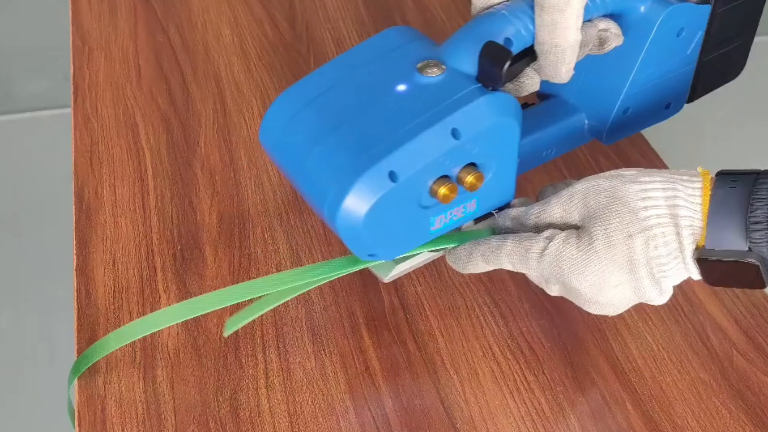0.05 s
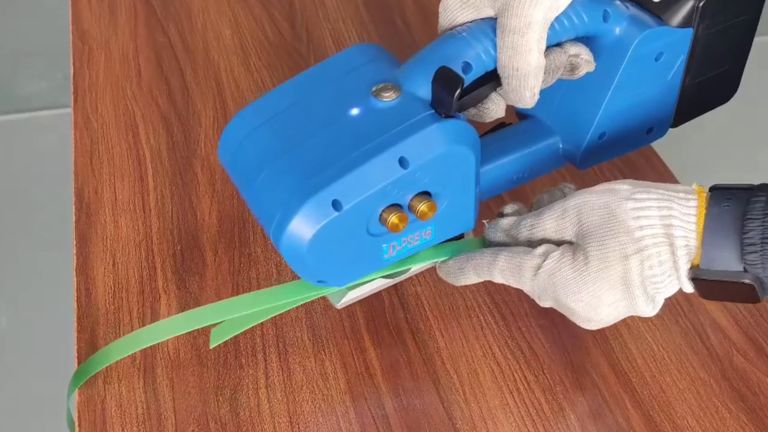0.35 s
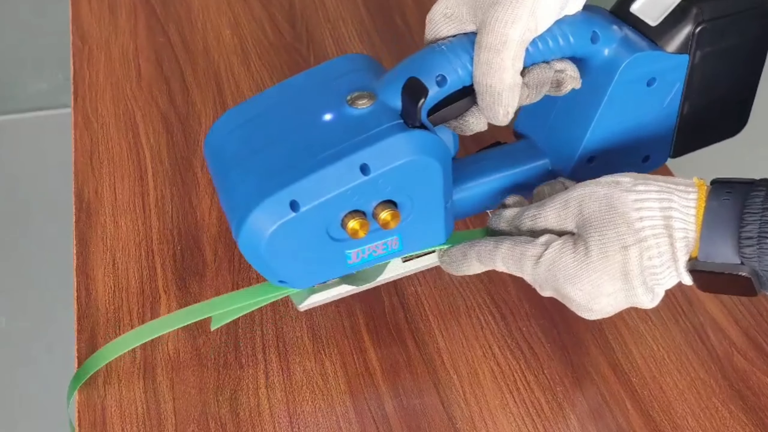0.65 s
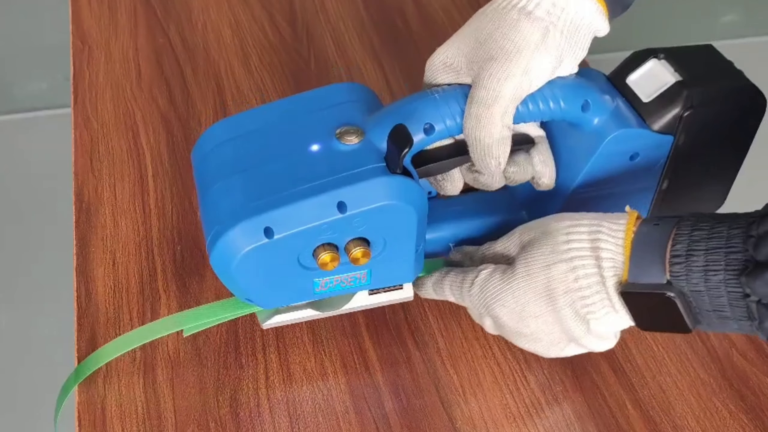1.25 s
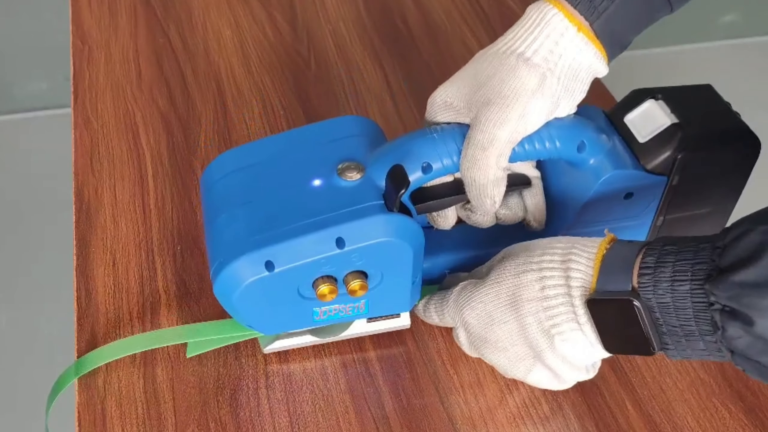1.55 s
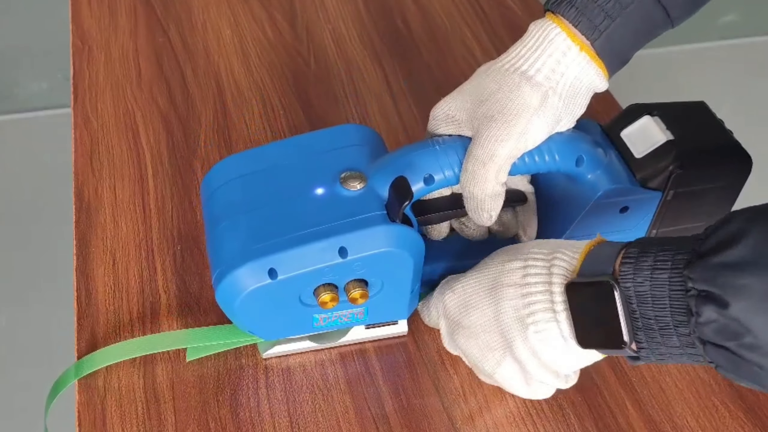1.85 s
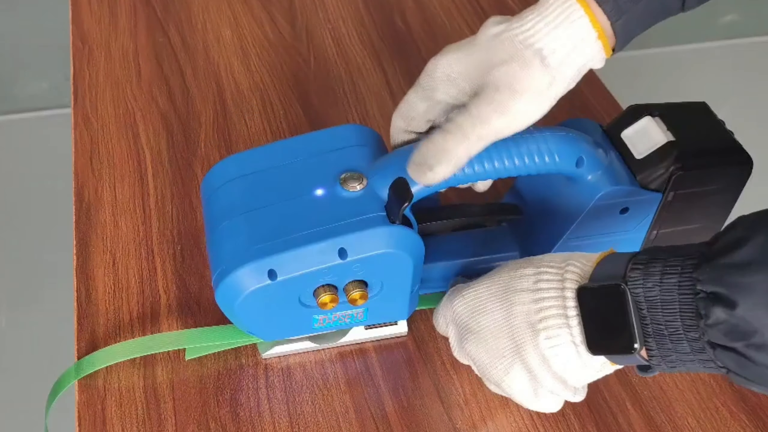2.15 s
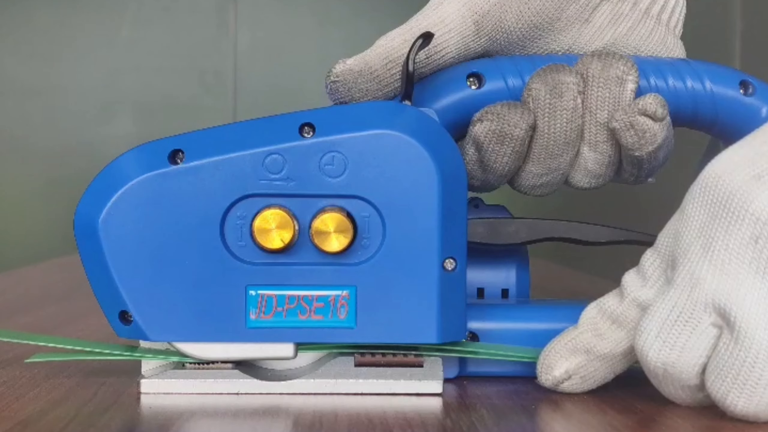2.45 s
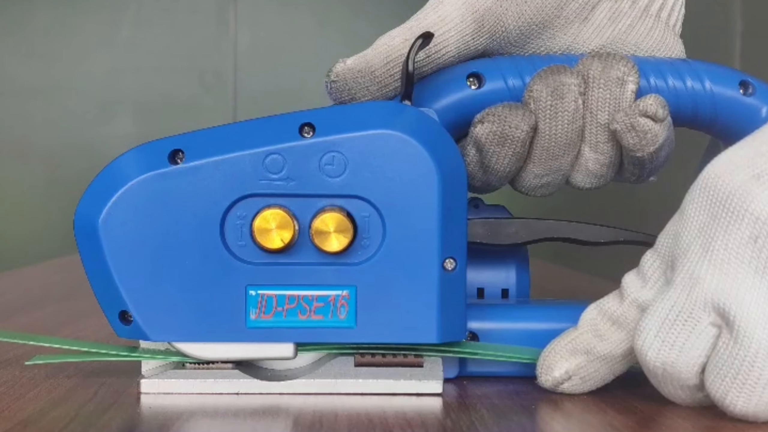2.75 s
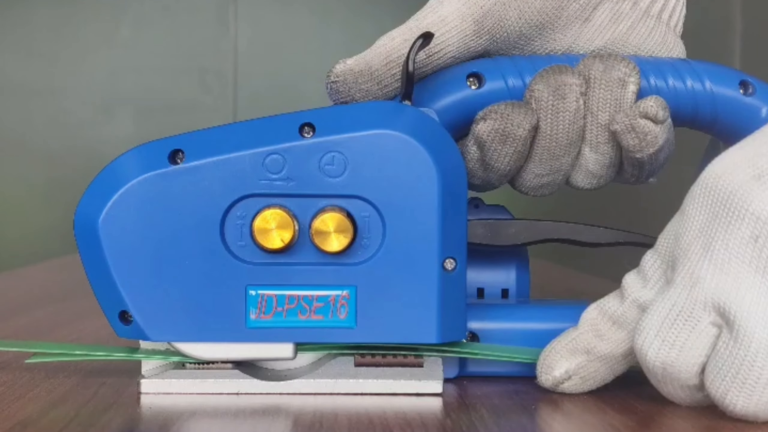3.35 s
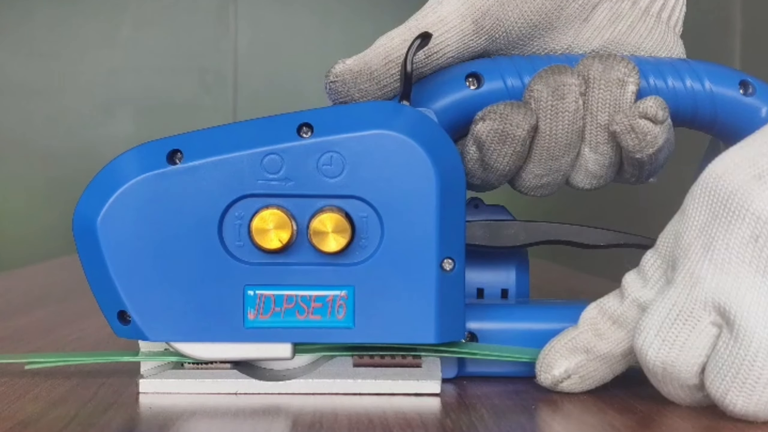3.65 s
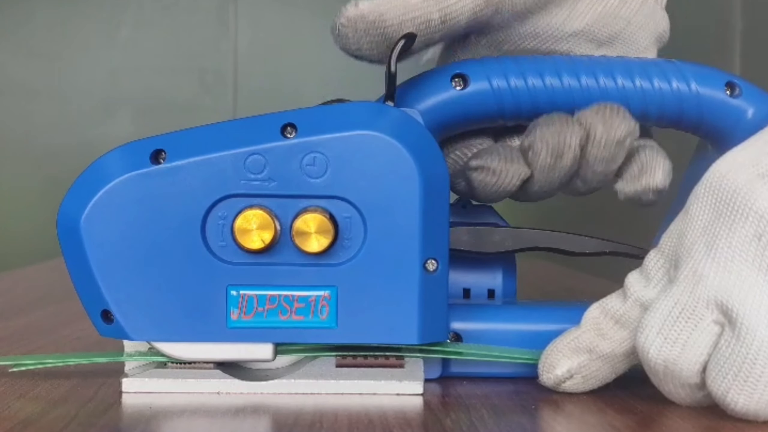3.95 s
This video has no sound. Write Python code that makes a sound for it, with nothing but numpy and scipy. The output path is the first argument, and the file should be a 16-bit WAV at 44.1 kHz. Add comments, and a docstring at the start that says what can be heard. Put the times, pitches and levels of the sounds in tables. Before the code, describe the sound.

A battery strapping tool whirs briefly in a hard-walled workshop. First a plastic strap clicks and scrapes into its jaw and something thumps the wooden table; then the nearby motor whines, rattles, slows and stops with deep knocks.

```python
"""Plastic strap slides and clicks into the jaw of a battery strapping tool, and something thumps on the
wooden table under it. Then the motor spins up: one shaft speed drives the whine and the gear rattle that
rings the housing. The speed sags as the strap comes tight; the tool shakes the table, kicks against it
and stops. The hard-walled workshop rings on over a low rumble and hiss."""
import sys
import numpy as np
from scipy import signal
from scipy.fft import rfft, irfft, next_fast_len
from scipy.io import wavfile
from scipy.ndimage import map_coordinates

SR = 44100
rng = np.random.default_rng(int(sys.argv[2]) if len(sys.argv) > 2 else 0)


def dump(signal):
    """Clip the signal to [-1, 1] and save it as 16-bit WAV at the path in sys.argv[1]."""
    limited = np.clip(np.atleast_2d(signal).T, -1, 1)
    pcm = np.round(limited * 32767).astype(np.int16)
    wavfile.write(sys.argv[1], SR, pcm)


N = 176400
T = np.arange(N) / SR
FULL_SPEED_HZ = 230.6  # motor shaft
# Stereo image near the tool. Each row: frequency in Hz, left-right correlation.
TOOL_CORRELATION = [(300, 1), (900, 0.86), (2000, 0.12), (5000, -.1), (8000, 0.07), (12000, -.5)]


def amp(db):
    """Decibels to gain."""
    return 10 ** (np.asarray(db) / 20)


def unit(x):
    """Scale to rms 1."""
    return x / np.sqrt(np.mean(x ** 2) + 1e-20)


def along(points, hz):
    """Interpolate (Hz, value) rows on a log axis."""
    f, v = np.transpose(points)
    return np.interp(np.log(hz + 1), np.log(f + 1), v)


def curve(rows):
    """Interpolate (s, value) rows at every sample."""
    return np.interp(T, *np.transpose(rows))


def wobble(rate_hz):
    """Smooth random curve, rms near 1, with rate_hz knots a second."""
    return map_coordinates(rng.standard_normal(int(N * rate_hz / SR) + 4), [T * rate_hz])


def noise():
    """Two independent white noises."""
    return rng.standard_normal((2, N))


def pan(db):
    """Constant-power gains, left over right by db."""
    return unit(amp([[db / 2], [-db / 2]]))


def filtered(x, response):
    """Apply a frequency response, given as a function of Hz."""
    m = next_fast_len(N + SR // 2)
    return irfft(rfft(x, m) * response(np.fft.rfftfreq(m, 1 / SR)), m)[..., :N]


def resonance(f, hz, width_hz):
    """Causal response of one mode."""
    return 1j * f * width_hz / (hz * hz - f * f + 1j * f * width_hz)


def spread(pair, spectrum=((1000, 0),), correlation=TOOL_CORRELATION):
    """Mix two independent signals to stereo of rms 1; the default spectrum is flat."""
    def mid_side_gains(f):
        angle = np.arccos(np.clip(along(correlation, f), -0.99, 0.99)) / 2
        return amp(along(spectrum, f)) * [np.cos(angle), np.sin(angle)]
    mid, side = filtered(pair, mid_side_gains)
    return unit(np.array([mid + side, mid - side]))


def fuzzy_tone(cycles, width_hz):
    """Stereo tone blurred over a narrow band, rms 1."""
    blur = np.array([wobble(2 * width_hz) + 1j * wobble(2 * width_hz) for side in range(2)])
    return unit(np.real(blur * np.exp(2j * np.pi * cycles)))


def reverb(x, wet_db):
    """The hard walls return a decaying tail, near mono in the bass."""
    # Room decay. Each row: frequency in Hz, T60 in seconds.
    t60_s = [(120, 0.81), (800, 1.06), (2000, 0.96), (5000, 0.9), (9000, 0.63), (14000, 0.25)]
    hz, t, bands = signal.stft(noise()[:, :SR], SR, nperseg=256)
    tail = signal.istft(bands * amp(-60 * t / along(t60_s, hz)[:, None]), SR, nperseg=256)[1]
    mid, side = tail / np.linalg.norm(tail[0])
    side = signal.sosfilt(signal.butter(1, 700, 'high', fs=SR, output='sos'), side)
    tail = np.pad([mid + side, mid - side], ((0, 0), (SR // 300, 0))) / np.sqrt(2)
    return amp(wet_db) * signal.fftconvolve(x * np.ones((2, 1)), tail, axes=1)[:, :N]


def air():
    """The workshop's low rumble and hiss."""
    # Each row: frequency in Hz, relative density in dB.
    spectrum = [(15, -21.5), (23, 10), (29, -14), (40, 1.5), (50, -13.5), (110, -6), (160, -15.5),
                (200, -14.5), (290, -13.5), (420, -20), (580, -23.5), (800, -25), (1300, -28.5),
                (3260, -37.5), (7800, -38), (9500, -47.5), (15500, -50)]
    # Each row: frequency in Hz, left-right correlation.
    correlation = [(60, 0.94), (180, 1), (550, 0.33), (1650, -0.45), (4970, 0.011), (15000, 0.13)]
    return amp(-42.5 + 0.84 * wobble(3.5)) * spread(noise(), spectrum, correlation)


def strap():
    """Strap and glove scrape grainily against the tool."""
    # Each row: time in seconds, level in dB.
    slide_db = [(0, -54.5), (.3, -54.5), (.42, -61), (.55, -57), (.88, -64), (1.03, -47), (1.1, -48.5),
                (1.14, -40.5), (1.2, -46), (1.27, -47), (1.45, -54), (2.1, -59), (2.5, -60.5)]
    # Each row: frequency in Hz, relative density in dB.
    spectrum = [(290, -26), (500, -5.5), (594, -3), (901, -25.5), (1720, -11.5), (5050, -17.5),
                (5670, -24.5), (8120, -19.5), (15500, -47)]
    level = amp(curve(slide_db) + 1.76 * wobble(25.1))
    grains = noise() * amp(0.82 * wobble(500))
    return level * spread(grains, spectrum)


def clicks(spectrum, ring_trim_db=0):
    """Plastic and steel crack in the jaw: noise bursts, each with its own colour and short ring."""
    # Each row: start in seconds, level in dB, T60 in seconds, bass in dB, treble in dB,
    # ring pitch in Hz, ring gain in dB.
    cracks = [(.066, -18, 0.099, 5, -11, 3070, -3), (.186, -24, .008, -12, 2, 7500, -1),
              (0.25, -24.5, 0.015, -3, -9, 7500, -10), (.29, -22, 0.0092, 10, -8, 7500, -12),
              (.345, -6, 0.016, -5, -24, 5400, -16), (0.5782, 3.5, 0.012, -1.5, -2.5, 3290, 6.5),
              (0.9651, -6, 0.052, 11.5, -18, 1740, 17), (1.0117, -18.5, 0.079, -3, -4, 7500, -9),
              (1.915, -22.5, 0.016, 4, -22, 2670, 16)]
    out, t = np.zeros((2, N)), np.arange(SR // 10) / SR
    size, lead = 2 * len(t), SR // 100
    f = np.fft.rfftfreq(size, 1 / SR)
    for start_s, db, t60_s, bass_db, treble_db, ring_hz, ring_db in cracks:
        common, left, right = rng.standard_normal((3, len(t))) * amp(-60 * t / t60_s)
        burst = common + 0.62 * np.array([left, right])
        tilt_db = along([(1500, bass_db), (3500, 0), (7500, 0), (11000, treble_db)], f)
        ring = amp(ring_db + ring_trim_db) * resonance(f, ring_hz, width_hz=200)
        colour = amp(along(spectrum, f) + tilt_db) * (1 + ring)
        crack = np.roll(irfft(rfft(burst, size) * colour), lead, axis=1)
        out[:, round(start_s * SR) - lead:][:, :size] += amp(db) * crack / np.linalg.norm(crack)
    return out * pan(1.1)


def handling():
    """Each click rings the housing briefly and scatters into the room."""
    # A click, direct and at the walls. Each row: frequency in Hz, relative density in dB.
    direct_spectrum = [(150, 12), (750, -4.5), (1500, -9.5), (2400, 3), (3200, 4), (4400, -0.5),
                       (6300, 0.5), (7900, 8.5), (9300, 3.5), (12000, 4), (15500, -5)]
    wall_spectrum = [(200, -6), (800, 9.5), (1200, -2), (2600, 0), (3500, -1), (4500, -3.5), (5600, -6.5),
                     (7900, -5), (9300, -7), (12000, 3), (15500, -5)]
    direct = clicks(direct_spectrum)
    housing = amp(10) * filtered(direct, lambda f: resonance(f, hz=780, width_hz=150))
    scatter = sum(reverb(clicks(wall_spectrum, ring_trim_db=-14), wet_db=-7) for path in range(3))
    return direct + housing + scatter


def table_top(force):
    """The wooden top rings in its modes; soft contact passes little treble."""
    # Each row: frequency in Hz, width in Hz, gain in dB.
    modes = [(103, 16, -5), (156.5, 29, 8), (169, 15, -6), (237.4, 13.6, -1), (413, 23, -28.5),
             (665, 100, -15), (835, 34, -38), (1350, 450, -53.5)]
    contact_hz = 1100
    soft = lambda f: 1 / (1 + 1j * np.sqrt(2) * f / contact_hz - (f / contact_hz) ** 2)
    wood = lambda f: sum(amp(db) * resonance(f, hz, width_hz) for hz, width_hz, db in modes)
    return filtered(force, lambda f: soft(f) * wood(f))


def thumps():
    """A blow on the table and its rebounds; the shorter the contact, the more the tool clatters."""
    # Each row: time in seconds, relative impulse in dB, contact time in seconds.
    blows = [(1.745, 3, 0.00055), (1.7653, 7, 0.0034), (1.785, -3, 0.0019), (1.862, -4, 0.001),
             (1.875, -7, 0.0011), (1.896, -7, 0.002), (1.916, -3.5, 0.0033), (1.97, -4.5, 0.0018)]
    # Each row: frequency in Hz, relative density in dB.
    clatter_spectrum = [(150, 1.5), (400, 7), (560, -3), (880, -1), (1100, -12.5), (1550, -12),
                        (2000, -18.5), (5000, -27), (12000, -66)]
    rise_s, t60_s, first_contact_s = 0.0007, 0.12, blows[0][2]
    force, clatter = np.zeros(N), np.zeros(N)
    for time_s, db, contact_s in blows:
        t = T - time_s
        push = np.exp(-(2 * t / contact_s) ** 2)
        force -= amp(db + 18.5) * push / push.sum()
        envelope = np.clip(t / rise_s, 0, 1) * amp(db - 60 * abs(t) / t60_s)
        clatter += envelope * first_contact_s / contact_s
    return table_top(force) + amp(-30) * clatter * spread(noise(), clatter_spectrum)


def shudder():
    """The tightening strap makes the tool shake the table."""
    # Each row: time in seconds, level in dB.
    level_db = [(3.1, -55), (3.37, -36.5), (3.45, -40), (3.63, -40.5), (3.66, -29.5), (3.77, -33.5),
                (3.82, -57), (3.95, -72)]
    return amp(curve(level_db)) * unit(table_top(rng.standard_normal(N)))


def kicks():
    """The stalling tool kicks the table in a quick run of deep knocks."""
    # Each row: start in seconds, level in dB, pitch in Hz.
    knocks = [(3.6549, -19, 121), (3.679, -17, 146), (3.709, -19, 128.6), (3.735, -21.5, 176),
              (3.764, -23, 178)]
    rise_s, t60_s = 0.0025, 0.11
    out = np.zeros(N)
    for start_s, db, hz in knocks:
        t = np.maximum(T - start_s, 0)
        out += amp(db - 60 * t / t60_s) * (1 - np.exp(-t / rise_s)) * np.sin(2 * np.pi * hz * t)
    return out


def howl():
    """The housing's main resonance swells and shifts in pitch with the load."""
    # Each row: time in seconds, level against the drive in dB.
    level_db = [(2.57, 0), (2.63, -10), (2.85, -9), (2.92, -6), (3.0, -11.5), (3.11, -6.5), (3.3, -12.5),
                (3.45, -11), (3.57, -4), (3.62, -14.5), (3.71, -1.5)]
    # Each row: time in seconds, pitch in Hz.
    pitch_hz = [(2.57, 769), (2.63, 831.6), (2.93, 836), (3.01, 868.4), (3.11, 849), (3.31, 858.6),
                (3.4, 831.5), (3.62, 820), (3.7, 843.4)]
    hz, width_hz = curve(pitch_hz), 52.6
    ring = unit(filtered(spread(noise()), lambda f: resonance(f, hz.max(), width_hz * np.sqrt(2)) ** 2))
    position = np.cumsum(hz / hz.max())  # slower reading lowers the pitch
    return amp(curve(level_db)) * pan(1.7) * np.array([map_coordinates(side, [position]) for side in ring])


def chatter(turns):
    """Worn teeth strike unevenly, harder once a turn; part of the pattern repeats every two turns."""
    repeat_share, slip_turns, grit_db = 0.34, 0.022, 2.3
    pattern = noise()[:, :SR // 110]
    position = (turns + slip_turns * wobble(40)) / 2 % 1 * pattern.shape[1]
    buzz = unit(np.array([map_coordinates(side, [position], mode='grid-wrap') for side in pattern]))
    impacts = np.sqrt(repeat_share) * buzz + np.sqrt(1 - repeat_share) * noise()
    return impacts * amp(grit_db * wobble(700)) * (1 + 0.099 * np.cos(2 * np.pi * turns))


def gears(speed_hz, turns):
    """Chattering teeth rattle and ring the housing; slow gears sound duller."""
    # Rattle. Each row: frequency in Hz, relative density in dB.
    spectrum = [(100, -11.5), (280, -6.5), (420, -1.5), (600, -4.5), (720, -1), (1020, -4.5), (1250, 3),
                (1850, 1), (2400, 4), (2900, -1), (4000, -0.5), (6300, -3.5), (8200, -3.5), (9100, -7.5),
                (10500, -10), (12300, -10), (13500, -29), (15500, -33)]
    # Housing. Each row: frequency in Hz, width in Hz, relative gain in dB, left over right in dB.
    modes = [(716, 37, 3.5, 1), (1160, 66, 2, 2), (1622, 53, 6, -5), (2227, 160, 5, -3),
             (2470, 180, -7, 13), (2800, 80, 2.5, 7)]
    rattle = spread(chatter(turns), spectrum)
    dull = filtered(rattle, lambda f: 1 / (1 + (f / 2600) ** 2))
    rattle = dull + (rattle - dull) * (speed_hz / FULL_SPEED_HZ) ** 0.17
    mode = lambda f, hz, width_hz: resonance(f, hz, width_hz) / (1 + ((f - hz) / (5 * width_hz)) ** 2)
    housing = lambda f: sum(amp(db) * pan(pan_db) * mode(f, hz, width_hz)
                            for hz, width_hz, db, pan_db in modes)
    ring = unit(filtered(spread(chatter(turns)), housing))
    return amp(-2.5) * rattle + amp(-8.5) * ring


def shriek(strain):
    """Fast gears excite a rough, high steel resonance that fades as they slow."""
    level_db = -8.5 - 11 * strain + wobble(45) + 3.9 * wobble(230)
    return amp(level_db) * pan(18) * fuzzy_tone(7720 * T, width_hz=460)


def gear_tone(cycles):
    """Sine of rms 1 with slow and fast phase jitter."""
    return np.sqrt(2) * np.sin(2 * np.pi * cycles + 0.67 * wobble(45) + 0.61 * wobble(300))


def whine(speed_hz, turns):
    """Gear tones, smeared by backlash under strain; tooth whine, a squeal an octave up, the shriek."""
    # Each row: multiple of the shaft rate, level in dB, left over right in dB, gain at full strain in dB.
    orders = [(2, -18, -5.5, -24), (4, -13.5, -2, -9), (6, -15.5, 0, -6), (7, -12, 3, -8.5),
              (10, -16, 1.5, 4.5), (11, -14, 0, 4)]
    # Tooth whine. Each row: time in seconds, level against the drive in dB.
    tooth_db = [(2.6, -15), (2.7, -12), (2.85, -9), (3.1, -12), (3.24, -8.5), (3.4, -10.5), (3.5, -16),
                (3.57, -8.5), (3.61, -17), (3.7, -6.5)]
    teeth, backlash_turns, full_strain_sag = 22, 0.006, 0.084
    sag = 1 - speed_hz / FULL_SPEED_HZ
    strain = np.clip(sag / full_strain_sag, 0, 1)
    fade = amp(-6 * np.clip((sag - full_strain_sag) / 0.07, 0, 1))  # more sag smothers the high whines
    loose_turns = turns + backlash_turns * strain * wobble(260)
    mesh = np.zeros((2, N))
    for order, db, pan_db, strain_db in orders:
        level = amp(db + strain_db * strain + 3 * wobble(30.03))
        mesh += pan(pan_db) * level * gear_tone(order * loose_turns)
    rough = gear_tone(teeth * turns) * amp(2 * wobble(220))
    haze = amp(-11) * fuzzy_tone(teeth * turns, width_hz=81)
    tooth = amp(curve(tooth_db) + 1.8 * wobble(22.96)) * pan(16) * unit(rough + haze)
    squeal = amp(-18.5 - 6 * strain) * pan(-32) * fuzzy_tone(2 * teeth * turns, width_hz=300)
    return mesh + fade * (tooth + squeal) + shriek(strain)


def motor():
    """One shaft drives whine and rattle; the whine beams forward, the rattle fills the room."""
    # Each row: time in seconds, shaft speed in turns a second.
    shaft_hz = [(2.565, 60), (2.59, 138), (2.615, 192), (2.65, 222), (2.72, 228.5), (2.82, 229.7),
                (2.95, 225.7), (3.3, 225.4), (3.45, 222), (3.55, 214), (3.6, 203), (3.63, 194),
                (3.655, 182), (3.72, 159)]
    # Each row: time in seconds, drive level in dB.
    drive_db = [(2.555, -74), (2.578, -35), (2.6, -24), (2.62, -20.5), (2.75, -21), (2.9, -19.5),
                (3.3, -19), (3.55, -18.5), (3.63, -20), (3.71, -21.5), (3.74, -38.5), (3.79, -62)]
    start_s = shaft_hz[0][0]
    speed_hz = curve(shaft_hz) * (1 + 0.0021 * wobble(40))
    turns = np.cumsum(speed_hz) / SR
    drive = amp(curve(drive_db) + 1.14 * wobble(29.9)) * (T > start_s)
    body = drive * (gears(speed_hz, turns) + howl())
    tones = drive * whine(speed_hz, turns)
    return body + reverb(body, wet_db=-2.5) + tones + reverb(tones, wet_db=-3.5)


def scene():
    """Tool, table and strap in one room."""
    table, knocks = thumps() + shudder(), kicks()
    tool = motor()
    table_reverb = reverb(table, wet_db=-2.5) + reverb(knocks, wet_db=-8.5)
    return tool + table + knocks + table_reverb + handling() + strap() + air()


def record(dry):
    """Band limit at 15.6 kHz."""
    return filtered(dry, lambda f: f < 15600)


dry = scene()
out = record(dry)
dump(out)
```